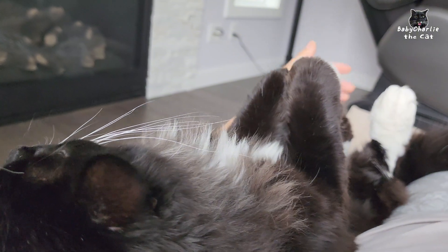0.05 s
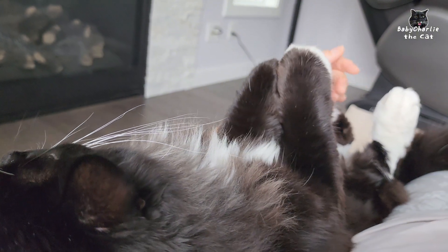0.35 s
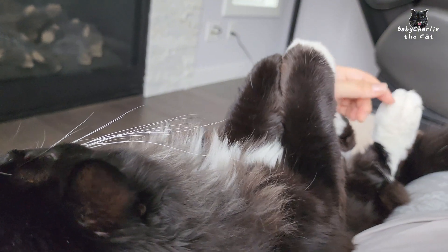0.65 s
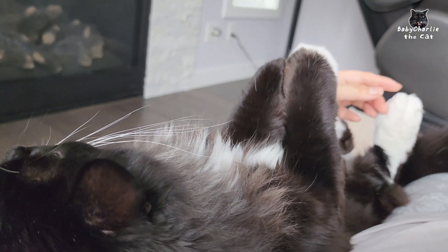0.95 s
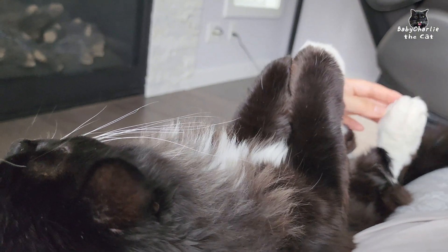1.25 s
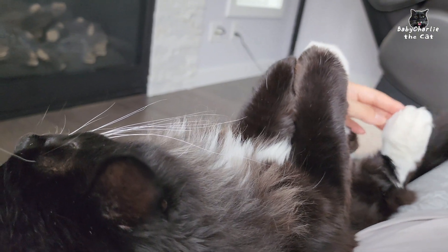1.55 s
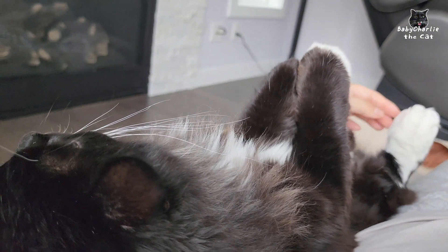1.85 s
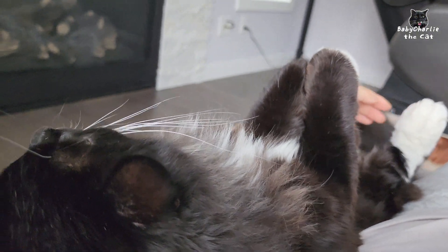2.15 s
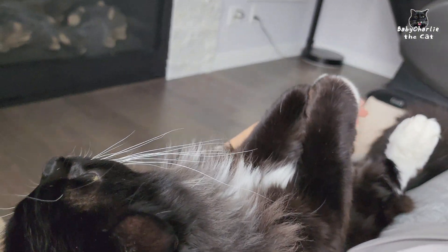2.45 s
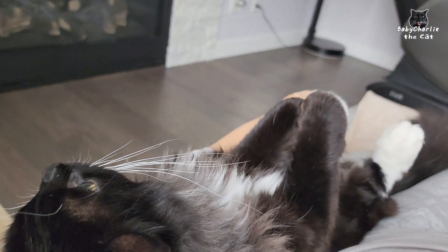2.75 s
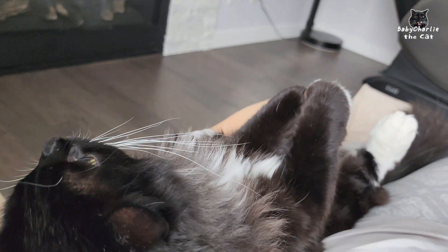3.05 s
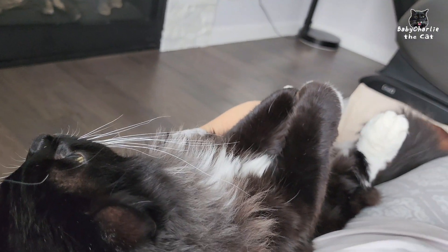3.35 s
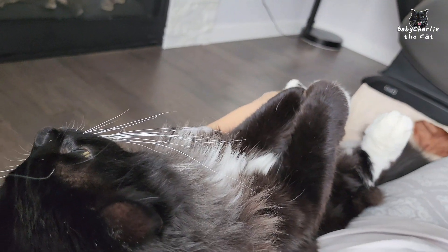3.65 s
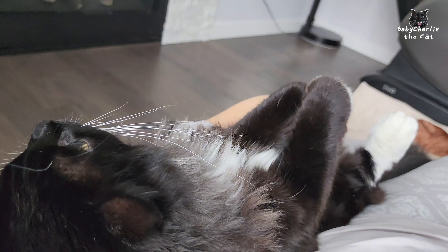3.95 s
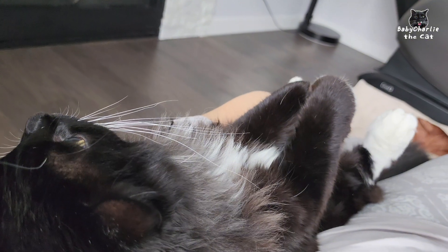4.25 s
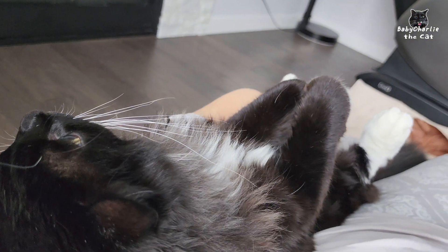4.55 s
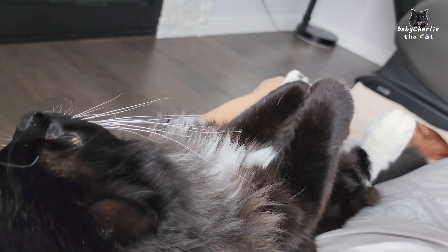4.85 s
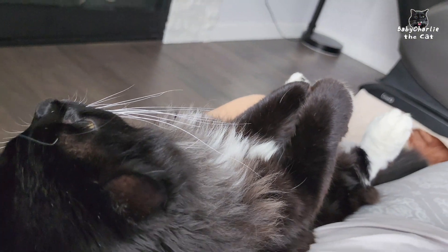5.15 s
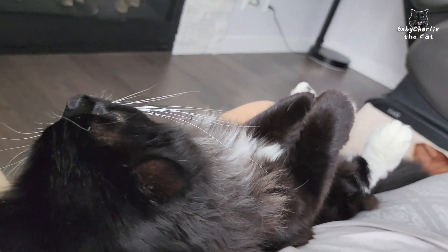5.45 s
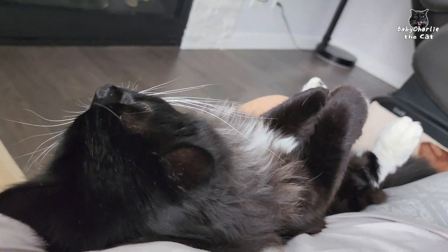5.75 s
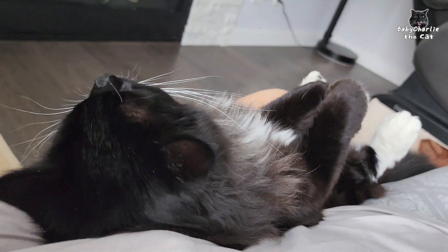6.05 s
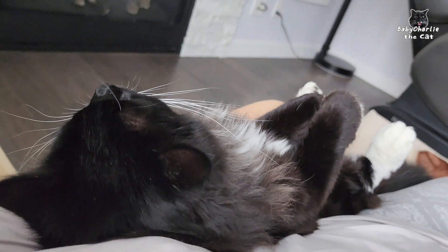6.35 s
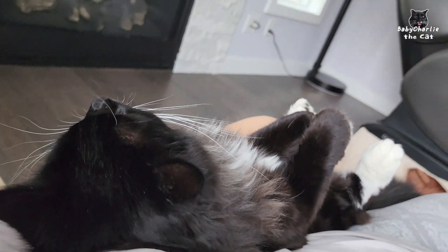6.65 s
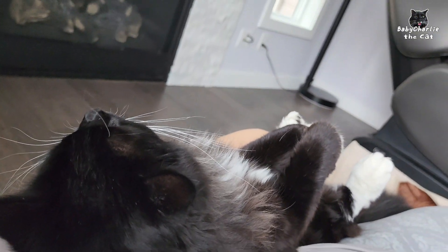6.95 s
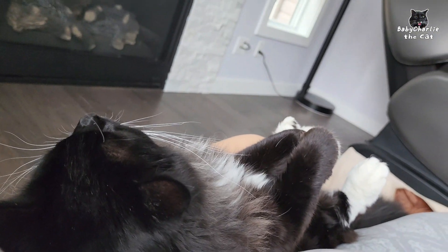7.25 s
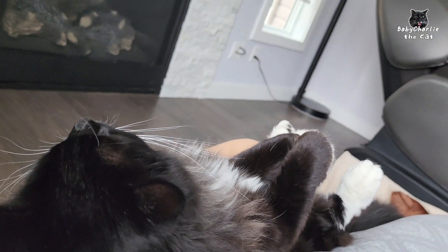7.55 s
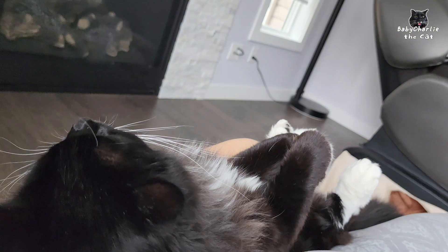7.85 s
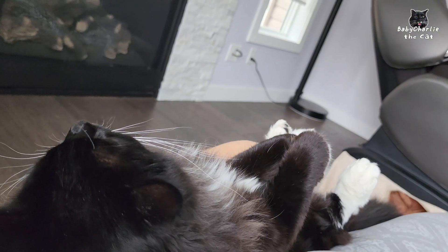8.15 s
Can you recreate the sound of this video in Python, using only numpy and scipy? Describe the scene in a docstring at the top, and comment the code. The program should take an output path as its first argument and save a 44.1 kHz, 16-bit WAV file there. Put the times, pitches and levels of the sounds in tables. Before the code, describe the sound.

A cat purrs close to a hand-held microphone in a quiet living room, the low flutter swelling every second or two over a faint rumble and appliance hum. Fur brushes softly and a few small taps sound. About six seconds in, cloth drags loudly across the right side of the microphone with snaps, scratches and thuds. The purr carries on, with lighter bumps and one sharp knock near the end.

```python
"""A quiet living room, a cat on a lap, a hand-held phone's stereo microphone close to the cat.
The room rumbles and an appliance hums behind; small things tap and clink nearby. Fur and clothing brush
about and once drag right over the microphone ports, and bumps and snaps come through the phone's case.
Up close the cat purrs: its larynx shuts and reopens about 27 times a second, heard through throat and
chest, and the purr swells every second or two."""
import sys
import numpy as np
from scipy import signal
from scipy.fft import rfft, irfft, next_fast_len
from scipy.io import wavfile
from scipy.ndimage import map_coordinates

SR = 44100
rng = np.random.default_rng(int(sys.argv[2]) if len(sys.argv) > 2 else 0)


def pcm_store(signal):
    """Save signal as 16-bit PCM."""
    levels = np.round(np.clip(np.atleast_2d(signal), -1, 1) * 32767)
    wavfile.write(sys.argv[1], SR, levels.astype(np.int16).T)


N = 370878
TIME = np.arange(N) / SR
DRAG_PORT_PAN_DB = -15.5  # every pan is left minus right: the cloth lies on the right port


def amp(db):
    return 10 ** (np.asarray(db) / 20)


def unit(x):
    return x / np.sqrt(np.mean(x ** 2) + 1e-20)


def bell(t, width):
    """A smooth rise and fall that peaks at t = 0."""
    return np.exp(-.5 * (t / width) ** 2)


def stroke(s, half):
    """Gain of a stroke that swells and fades around time s."""
    return np.exp(-.5 * np.abs((TIME - s) / half) ** 1.5)


def along(points, hz):
    """Read (frequency [Hz], value) points along a log axis."""
    f, v = np.transpose(points)
    return np.interp(np.log(hz + 1), np.log(f + 1), v)


def wobble(rate):
    """A smooth random curve, rate knots a second."""
    return map_coordinates(rng.standard_normal(int(N * rate / SR) + 4), [TIME * rate])


def filtered(x, response):
    """x through a response given as a function of frequency."""
    m = next_fast_len(x.shape[-1] + 8192)
    return irfft(rfft(x, m) * response(np.fft.rfftfreq(m, 1 / SR)), m)[..., :x.shape[-1]]


def panned(pan_db):
    """Left and right gains of mean power 1."""
    return unit(amp([[pan_db / 2], [-pan_db / 2]]))


def impulse(spectrum, size=4096):
    """Minimum-phase pulse of peak 1 with the given spectrum."""
    cepstrum = irfft(np.log(amp(along(spectrum, np.fft.rfftfreq(size, 1 / SR)))))
    cepstrum[1:size // 2] *= 2
    cepstrum[size // 2 + 1:] = 0
    response = irfft(np.exp(rfft(cepstrum)))
    return response / np.abs(response).max()


def add(track, s, sound):
    """Mix a sound in from time s."""
    part = track[..., round(s * SR):][..., :sound.shape[-1]]
    part += sound[..., :part.shape[-1]]


def room_echo(x, t60, wet_db):
    """Walls and furniture answer differently at each port."""
    t = np.arange(SR // 2) / SR
    tail = rng.standard_normal((2, len(t))) * amp(-60 * t / t60) * (t > .004)
    tail /= np.linalg.norm(tail[0])
    return amp(wet_db) * signal.fftconvolve(x[None], tail, axes=1)[:, :N]


def near_reflections(x, decay_s, depth_db):
    """Surfaces close to the microphone ripple the mids and treble, differently at each port."""
    t = np.arange(SR // 25) / SR
    tail = rng.standard_normal((2, len(t))) * np.exp(-t / decay_s)
    tail *= amp(depth_db) / np.linalg.norm(tail[0])
    echoes = signal.fftconvolve(x, tail, axes=1)[:, :N]
    return x + filtered(echoes, lambda hz: hz ** 2 / (hz ** 2 + 500 ** 2))


def living_room(mains_hz=60.03):
    """Room tone: rumble and hiss, and an appliance that whirs and hums at twice the mains frequency."""
    # spectrum of the room's air: (frequency [Hz], relative level [dB])
    air_spectrum = [(12, -47), (20, -19), (65, -10.5), (101, -3.5), (126, -2.5), (192, -15), (268, -11.5),
                    (326, -17.5), (480, -19.5), (732, -28.5), (1380, -37.5), (1530, -36.5), (1760, -41.5),
                    (2300, -42.5), (3120, -43.5), (6280, -55), (8770, -61.5), (15800, -63.5)]
    # how alike the two ports hear it: (frequency [Hz], correlation [0..1])
    likeness = [(60, 0.97), (130, 1), (290, 1), (640, 0.22), (1400, 0.011), (15000, 0.065)]
    # narrow whirs of the appliance: (centre [Hz], width [Hz], level [dB])
    whirs = [(270, 7, -57), (479, 11, -58.5)]

    def mid_and_side(hz):
        angle = np.arccos(np.clip(along(likeness, hz), -1, 1)) / 2
        return amp(along(air_spectrum, hz)) * [np.cos(angle), np.sin(angle)]

    mid, side = filtered(rng.standard_normal((2, N)), mid_and_side)
    air = amp(-40.5 + .6 * wobble(3)) * unit(np.array([mid + side, mid - side]))
    hum = amp(-40.5 + 1.3 * wobble(2.49)) * unit(np.sin(2 * np.pi * 2 * mains_hz * TIME))
    whir = sum(amp(db) * unit(filtered(rng.standard_normal(N), lambda hz: bell(hz - centre, width)))
               for centre, width, db in whirs)
    return (air + hum + whir) * panned(0.79)


def clinks(decay_s=.0045):
    """A small hard object in the room: every touch rings the same few modes through a soft scrape."""
    # touches on the object: (time [s], level [dB])
    touches = [(4.135, -54.5), (4.144, -53.5), (4.156, -62)]
    # its modes: (frequency [Hz], relative level [dB])
    modes = [(2080, -6), (2573, -8.5), (3219, -2.5), (5030, 0.5), (5663, -16), (7547, -19)]
    out, t = np.zeros(N), np.arange(SR // 10) / SR
    for s, db in touches:
        ring = sum(amp(level + rng.normal(0, 1.5)) * np.sin(2 * np.pi * hz * t) for hz, level in modes)
        scrape = unit(filtered(rng.standard_normal(len(t)), lambda hz: 1 / (1 + (hz / 5500) ** 6)))
        add(out, s, amp(db) * (amp(-1.5) * ring + scrape) * np.exp(-t / decay_s))
    return out + room_echo(out, t60=.13, wet_db=-3)


def taps(decay_s=.0035):
    """Things nearby tap and tick: each light contact rings one mode over a brief burst of noise."""
    # light contacts: (time [s], level [dB], ring [Hz], pan [dB])
    contacts = [(3.833, -24.5, 690, 3), (3.836, -54.5, 6800, 2), (3.98, -55.5, 9600, 0),
                (4.404, -40.5, 7120, 3), (5.977, -22.5, 7200, -5), (5.9905, -26, 9730, -2),
                (7.053, -46, 12500, 18), (8.2865, -42, 2920, -2), (8.375, -41, 2680, 3)]
    out, t = np.zeros((2, N)), np.arange(SR // 10) / SR
    for s, db, ring_hz, pan_db in contacts:
        ring = np.sin(2 * np.pi * ring_hz * t) * np.exp(-t * ring_hz / 45)
        band = lambda hz: 1 / (1 + (1.6 * (hz / ring_hz - ring_hz / (hz + 1))) ** 2)
        burst = unit(filtered(rng.standard_normal((2, len(t))), band))
        envelope = np.exp(-t / decay_s) * (1 - np.exp(-2 * t * ring_hz))
        add(out, s, amp(db) * panned(pan_db) * (amp(-7) * ring + amp(-10.5) * burst) * envelope)
    return out + room_echo(out.mean(0), t60=.1, wet_db=-5)


def snaps(crack_decay_s=.0005, ring_decay_s=.0016):
    """Something catches on the phone's edge: a bright crack about a millisecond long, a brief ring."""
    # catches on the edge: (time [s], level [dB], ring [Hz], pan [dB])
    catches = [(5.8653, -26.5, 2300, -10.5), (5.877, -38.5, 1900, -10), (5.8949, -19.5, 3480, -10.5),
               (6.621, -47, 2100, -7)]
    # spectrum of the crack: (frequency [Hz], relative level [dB])
    spectrum = [(200, -12), (1000, 2), (2200, 5), (3500, 5), (5000, 3), (7000, 3.5), (9000, -11),
                (15000, -23)]
    out, t = np.zeros((2, N)), np.arange(SR // 50) / SR
    for s, db, ring_hz, pan_db in catches:
        noise = unit(filtered(rng.standard_normal((2, len(t))), lambda hz: amp(along(spectrum, hz))))
        crack = noise * np.exp(-t / crack_decay_s)
        ring = np.sin(2 * np.pi * ring_hz * t) * np.exp(-t / ring_decay_s)
        add(out, s, amp(db) * panned(pan_db) * (amp(-3.5) * crack + amp(-8) * ring))
    return out


def bumps():
    """Handling noise: a damped thud, deeper for a broad contact; a hard one clicks and rings the case."""
    # bumps on the phone: (time [s], thud peak [dB], thud pitch [Hz], hardness [dB], pan [dB])
    blows = [(3.829, -33, 130, -45, 1), (4.962, -22.5, 181, -47, 7), (5.865, -21.5, 343, -29, 20),
             (5.8948, -17.5, 193, -22, -2), (5.9007, -18, 73.5, -50, -4), (6.097, -11, 190, -38, -14),
             (6.113, -6.5, 148, -42, -13), (6.127, -5, 149, -40, -17), (6.15, -15.5, 115, -44, -12),
             (6.243, -15.5, 105, -47, -12), (6.391, -22, 376, -30, -20), (6.403, -22.5, 190, -36, -17),
             (6.434, -22.5, 514, -34, -19), (6.512, -18, 350, -41, -25), (6.553, -24.5, 96, -40, -10),
             (6.984, -31, 450, -28, -18), (7.176, -32.5, 510, -24, -17), (7.423, -24, 280, -30, -21),
             (7.636, -18, 252, -38, -29), (7.797, -18, 298, -30, -29), (7.837, -23, 223, -22.5, -21),
             (8.169, -25, 267, -44, -14), (8.3065, -8.5, 140, -25, 13), (8.3126, -20.5, 230, -49, 17)]
    # spectrum of the thud: (frequency [multiple of its pitch], relative level [dB])
    thud_spectrum = [(.1, -22), (.5, -2.5), (1, 2.5), (1.7, -2.5), (3, -24.5), (10, -50.5), (60, -94)]
    # spectrum of the click: (frequency [Hz], relative level [dB])
    click_spectrum = [(300, -12), (1400, 11.5), (3700, -9), (5500, -33), (7500, -40.5), (15000, -40)]
    # modes of the phone's case: (frequency [Hz], relative level [dB], decay [s])
    case_modes = [(1150, -11, 0.0018), (1940, 2.5, 0.0013), (2430, -7.5, .002), (3490, -9, 0.0031),
                  (3780, -10.5, 0.0051), (6300, -28, .002)]
    out, t = np.zeros((2, N)), np.arange(SR // 20) / SR
    ring = sum(amp(db) * np.sin(2 * np.pi * hz * t) * np.exp(-t / decay) for hz, db, decay in case_modes)
    click = amp(3.5) * impulse(click_spectrum)[:len(t)] + amp(-1) * ring
    for s, db, thud_hz, hard_db, pan_db in blows:
        blow = -amp(db) * panned(pan_db)
        thud = impulse([(multiple * thud_hz, level) for multiple, level in thud_spectrum])
        add(out, s, blow * thud)
        add(out, s + .0005, blow * amp(hard_db) * click)
    return out


def friction(spectrum, grain_rate, grain_db, alike):
    """Fibres catch and slip in clumps; the two ports share the fraction alike of the power."""
    slips = rng.standard_normal((3, N)) * amp(grain_db * wobble(grain_rate))
    pair = np.sqrt(alike) * slips[2] + np.sqrt(1 - alike) * slips[:2]
    return unit(filtered(pair, lambda hz: amp(along(spectrum, hz))))


def brushes(rumble, scuff, scrape, hiss, fizz):
    """Fur and cloth brush near the phone: a firm brush is dull and rumbles, a light one hisses more."""
    # strokes: (time [s], half length [s], level [dB], firmness [dB], pan [dB])
    strokes = [(0.65, 0.21, -73, -5, 0), (1.283, 0.1, -68, -5.5, 0), (2.482, 0.18, -65.5, -6.5, -6.5),
               (4.214, .04, -61, 0, -2.5), (5.53, 0.14, -61.5, -3.5, -0.5), (6.866, 0.13, -58.5, 2, -11),
               (7.205, 0.044, -66.5, 2, -11), (7.44, 0.053, -68, 10.5, -17), (7.833, 0.012, -50, 5.5, -20),
               (8.089, 1, -61.5, 5, -4)]
    out = np.zeros((2, N))
    for s, half, db, firm_db, pan_db in strokes:
        low = amp(7.5 + 2 * firm_db) * rumble + amp(4 + firm_db) * scuff
        high = amp(-11.5 - 1.9 * firm_db) * hiss + amp(-19.5 - .7 * firm_db) * fizz
        out += amp(db) * stroke(s, half) * panned(pan_db) * (low + scrape + high)
    return out


def scratches():
    """Coarse threads catch on the port in short, grainy surges, each through a resonance of its own."""
    # surges: (time [s], half length [s], level [dB], resonance [Hz], width [Hz])
    surges = [(5.9, 0.023, -51.5, 3450, 500), (5.922, .015, -54.5, 6840, 1500),
              (5.992, .014, -50, 4450, 250), (5.995, .007, -43.5, 7400, 600), (6.045, .016, -58, 6400, 347),
              (6.124, .01, -42.5, 1480, 900), (6.169, .007, -53, 6350, 600),
              (6.187, 0.0024, -43.5, 3900, 1000), (6.204, .006, -50.5, 6400, 700),
              (6.2, .008, -53, 4600, 600), (6.234, .002, -50, 5200, 1800), (6.264, .012, -42, 5000, 600),
              (6.291, .012, -35, 1900, 350), (6.301, 0.0083, -39.5, 7200, 900),
              (6.408, 0.017, -52.5, 1490, 796), (6.435, 0.0055, -42, 1300, 700),
              (6.481, 0.014, -50, 1300, 600), (6.543, .002, -51, 5700, 2000),
              (6.547, 0.0037, -47, 1900, 900)]
    out, t = np.zeros((2, N)), np.arange(-SR // 8, SR // 8) / SR
    grain = amp(4.5 * wobble(500))
    for s, half, db, centre_hz, width_hz in surges:
        slips = rng.standard_normal((2, len(t))) * grain[round(s * SR):][:len(t)]
        threads = unit(filtered(slips, lambda hz: 1 / (1 + 1j * (hz - centre_hz) / width_hz) ** 2))
        add(out, s + t[0], amp(db) * bell(t, half) * threads)
    return out * panned(DRAG_PORT_PAN_DB)


def pocket(centre_hz, low_edge_hz=224):
    """Scuffing through the air pocket under the cloth, whose broad resonance moves as the cloth shifts."""
    slips = friction([(100, 0), (5000, 0)], grain_rate=310, grain_db=3, alike=.12)
    hz, frame_s, spectra = signal.stft(slips, SR, nperseg=512)
    ratio = hz[:, None] / np.interp(frame_s, TIME, centre_hz)
    low_cut = hz ** 2 / (hz ** 2 + low_edge_hz ** 2)
    gain = low_cut[:, None] / ((1 - ratio ** 2) ** 2 + ratio ** 2)
    gain /= np.linalg.norm(gain, axis=0)
    _, scuff = signal.istft(spectra * gain, SR, nperseg=512)
    return unit(scuff[:, :N])


def judder(slip_hz=160, unevenness=.14):
    """The cloth sticks and lets go in a quick, uneven run of low pulses."""
    # spectrum of one slip: (frequency [Hz], relative level [dB])
    spectrum = [(60, -12), (120, -1), (190, 5.5), (280, -15.5), (470, -8), (800, -29), (3000, -60.5)]
    cycles = np.cumsum(slip_hz * np.exp(unevenness * wobble(70))) / SR
    slips = np.diff(np.floor(cycles), prepend=0) * amp(2 * wobble(120))
    pulses = signal.fftconvolve(slips - slips.mean(), -impulse(spectrum))[:N]
    return amp(-18) * stroke(s=6.095, half=.022) * unit(pulses)


def drag(rumble, scrape, hiss, fizz, land_s=.022, leave_s=.034):
    """Cloth drags over the right port: pressure rumbles, speed scrapes, and the air pocket scuffs."""
    # course of the drag:
    # (time [s], pressure [dB], scuff [dB], pocket resonance [Hz], sliding speed [dB], hiss [dB])
    course = [(5.905, -28.5, -36, 500, -50, -49), (5.945, -34, -40, 593, -44.5, -47),
              (5.975, -40, -39.5, 900, -39, -52), (6.026, -34, -33.5, 900, -43, -51.5),
              (6.07, -31, -31, 644, -41.5, -52.5), (6.106, -25, -23.5, 540, -48, -55.5),
              (6.138, -24, -24, 694, -46, -56.5), (6.164, -25, -32, 640, -44, -53),
              (6.195, -31, -33, 714, -42, -53), (6.235, -31, -35.5, 710, -44, -60),
              (6.25, -28, -28, 480, -39, -52), (6.266, -29, -21.5, 470, -35.5, -48.5),
              (6.299, -25.5, -28, 690, -32.5, -37), (6.329, -31, -34.5, 700, -37.5, -49),
              (6.365, -42, -45.5, 900, -51, -68), (6.398, -32, -30, 623, -51, -69),
              (6.455, -42, -45, 890, -53, -74), (6.475, -39, -33.5, 596, -55, -72),
              (6.525, -38, -46, 594, -59, -73), (6.544, -31, -31.5, 700, -39, -55.5),
              (6.558, -36, -52, 500, -62, -81), (6.59, -49, -47.5, 600, -66, -75),
              (6.615, -47, -43.5, 950, -51, -74), (6.655, -50, -56, 600, -73, -90)]
    times, *controls = np.transpose(course)
    pressure_db, scuff_db, pocket_hz, speed_db, hiss_db = (np.interp(TIME, times, c) for c in controls)
    outside_s = TIME - np.clip(TIME, times[0], times[-1])
    contact = bell(outside_s, np.where(TIME < times[0], land_s, leave_s))
    through_case = amp(pressure_db - 1.5) * rumble
    at_port = (judder() + amp(scuff_db) * pocket(pocket_hz) + amp(speed_db - 3.5) * scrape
               + amp(hiss_db - .5) * hiss + amp(hiss_db - 12) * fizz)
    return contact * (through_case * panned(-8.5) + at_port * panned(DRAG_PORT_PAN_DB))


def swishes(fizz):
    """Hairs flick across the right port."""
    # flicks: (time [s], half length [s], level [dB])
    flicks = [(5.992, 0.012, -41.5), (6.065, 0.032, -57.5), (6.32, 0.012, -35.5), (6.506, 0.072, -67.5)]
    return sum(amp(db) * stroke(s, half) for s, half, db in flicks) * fizz * panned(-12)


def rubbing():
    """The same fur and cloth make the light brushes and the one heavy drag."""
    # five bands that rubbing excites, low to high: (frequency [Hz], relative level [dB])
    rumble_band = [(15, -10.5), (50, 0), (110, 1), (185, -2), (280, -20.5), (700, -38), (2000, -87)]
    scuff_band = [(100, -41.5), (280, 5.5), (470, 5.5), (650, -3), (850, -5), (1200, -10), (2000, -32),
                  (5000, -67)]
    scrape_band = [(500, -37.5), (1050, 4), (1350, 6.5), (1900, 3), (2400, -1), (3200, -5.5), (4200, -31),
                   (6000, -44), (12000, -61.5)]
    hiss_band = [(2000, -20), (3200, 3.5), (4900, 0), (5700, .5), (7000, -1), (8300, -5.5), (9800, -7.5),
                 (15500, -36)]
    fizz_band = [(4000, -37), (7300, 0), (8700, -4), (11200, -4), (13000, -5.5), (15500, -7)]
    rumble = friction(rumble_band, grain_rate=200, grain_db=3, alike=.84)
    scuff = friction(scuff_band, grain_rate=310, grain_db=3, alike=.23)
    scrape = friction(scrape_band, grain_rate=360, grain_db=2.5, alike=.072)
    hiss = friction(hiss_band, grain_rate=160, grain_db=2, alike=.038)
    fizz = friction(fizz_band, grain_rate=910, grain_db=3, alike=.21)
    on_microphone = drag(rumble, scrape, hiss, fizz) + swishes(fizz) + scratches()
    return on_microphone + brushes(rumble, scuff, scrape, hiss, fizz)


def larynx(times, sizes, spectrum, reopen_db, reopen_s, scatter_db, jitter_s):
    """The larynx snaps shut once a cycle and opens again, more softly, about half a cycle later."""
    chance = rng.standard_normal((len(times), 4))
    when = times[:, None] + [0, reopen_s] + jitter_s * chance[:, :2] * [1, 2]
    size = sizes[:, None] * amp(np.array([0, reopen_db]) + scatter_db * chance[:, 2:])
    inside = (when >= 0) & (when < N / SR)
    train = np.bincount((when[inside] * SR).astype(int), size[inside], N)
    return -signal.fftconvolve(train, impulse(spectrum))[:N]


def soft_purr(swells, beat_hz=27.53, wander_hz=1.3, lull_db=4, lull_lag_s=.24):
    """The chest purrs softly and gives way during and just after a swell, most for the strongest."""
    # one beat heard through the chest: (frequency [Hz], relative level [dB])
    chest = [(15, -33.5), (40, -18.5), (80, 3), (140, 2.5), (195, -4.5), (265, -2), (420, -14.5), (480, -5),
             (570, -24), (900, -37), (2000, -52), (8000, -87)]
    strongest_db = max(db for *_, db in swells)
    lull = sum(amp(db - strongest_db) * bell(TIME - s - lull_lag_s, .3) for s, *_, db in swells)
    level_db = -33.5 - lull_db * lull + .2 * wobble(3.2)
    cycles = np.cumsum(beat_hz + wander_hz * wobble(2)) / SR
    times = np.interp(np.arange(int(cycles[-1]) + 1), cycles, TIME)
    sizes = amp(np.interp(times, TIME, level_db))
    return larynx(times, sizes, chest, reopen_db=-2.5, reopen_s=.01351, scatter_db=3, jitter_s=.0006)


def firm_purr(swells, beat_hz=27, alternate_db=3.5, rattle_hz=724):
    """The throat purrs in swells and rattles more brightly in the first, while it is wide open."""
    # one beat heard through the throat: (frequency [Hz], relative level [dB])
    throat = [(15, -19), (40, -13.5), (80, -1.5), (120, 5), (190, -2.5), (270, 0.5), (370, -3.5),
              (450, -18), (600, -13.5), (740, -24), (850, -31.5), (1050, -44.5), (3000, -54), (8000, -72)]
    offset_s = np.arange(-24, 25) / beat_hz
    times = np.concatenate([s + offset_s for s, *_ in swells])
    lilt = amp(alternate_db / 2 * np.cos(np.pi * offset_s * beat_hz))  # strong and weak beats alternate
    sizes = np.concatenate([amp(db) * lilt * bell(offset_s, np.where(offset_s < 0, rise, fall))
                            for _, rise, fall, db in swells])
    beats = larynx(times, sizes, throat, reopen_db=-7, reopen_s=.0175, scatter_db=2, jitter_s=.0004)
    rattle = filtered(beats, lambda hz: bell(hz - rattle_hz, width=79))
    wide_open = bell(TIME - .54, width=.3)
    return beats + amp(-2.5) * wide_open * rattle


def purr(left_lead_s=.00017):
    """The cat, close and a little left: firm swells alternate with a softer purr, and the room answers."""
    # swells of the purr: (time of the peak [s], rise [s], fall [s], level [dB])
    swells = [(0.5992, 0.21, 0.35, -23.5), (1.405, 0.21, 0.068, -31.5), (2.532, 0.32, 0.15, -25),
              (4.388, 0.28, 0.09, -28), (5.537, 0.17, 0.13, -22.5), (6.835, 0.17, 0.19, -29),
              (7.637, 0.15, 0.14, -29), (8.405, 0.16, .1, -25.5)]
    firm, soft = firm_purr(swells), soft_purr(swells)
    port_delays = lambda hz: np.exp(1j * np.pi * hz * left_lead_s * np.array([[1], [-1]]))
    direct = filtered(firm + soft, port_delays) * panned(1.7)
    return direct + room_echo(firm, t60=.2, wet_db=-8.5) + room_echo(soft, t60=.29, wet_db=-7.5)


def scene():
    """The cat up close, the handling at the microphone and the room behind them."""
    fur_and_cloth = near_reflections(rubbing(), decay_s=.006, depth_db=-14)
    room_tone = near_reflections(living_room(), decay_s=.0092, depth_db=-4.5)
    return purr() + fur_and_cloth + bumps() + snaps() + taps() + clinks() + room_tone


def record(dry, ceiling=.92, top_hz=15800):
    """The ports colour everything; the phone rounds off the hardest peaks and cuts the highest treble."""
    # narrow peaks and dips of the microphone ports and case: (centre [Hz], width [Hz], gain [dB])
    ports = [(857, 5.3, 3), (1300, 160, -1), (2040, 100, 2.5), (3200, 320, 0.5), (4400, 100, 3),
             (6120, 340, -1.5), (6310, 180, 5), (8780, 590, -7), (9600, 220, -0.5), (10690, 600, -5)]
    colour = lambda hz: amp(sum(db * np.exp(-((hz - centre) / width) ** 2) for centre, width, db in ports))
    heard = filtered(dry, colour)
    rounded = heard / (1 + np.abs(heard / ceiling) ** 6) ** (1 / 6)
    return filtered(rounded, lambda hz: hz < top_hz)


dry = scene()
out = record(dry)
pcm_store(out)
```